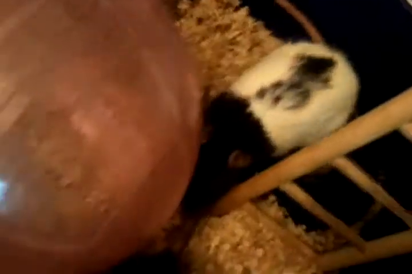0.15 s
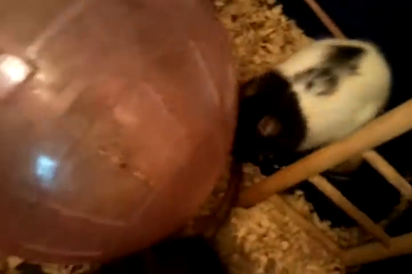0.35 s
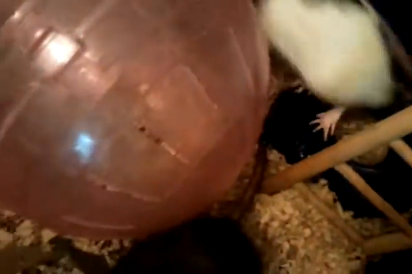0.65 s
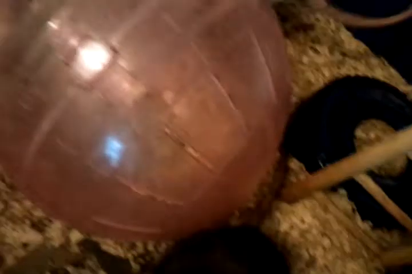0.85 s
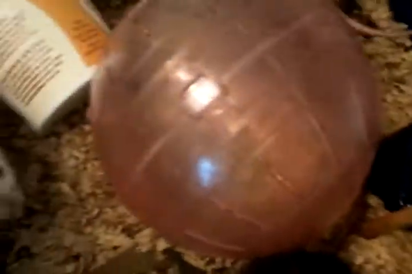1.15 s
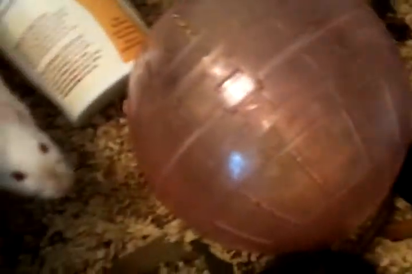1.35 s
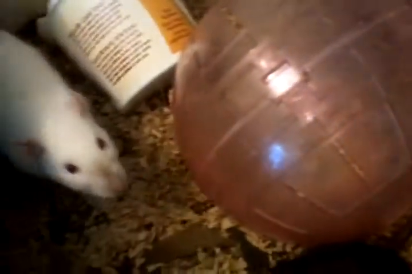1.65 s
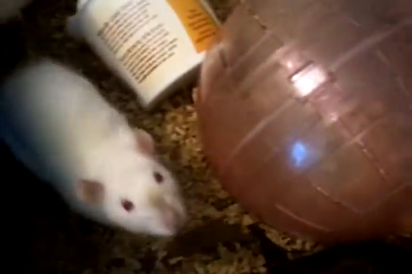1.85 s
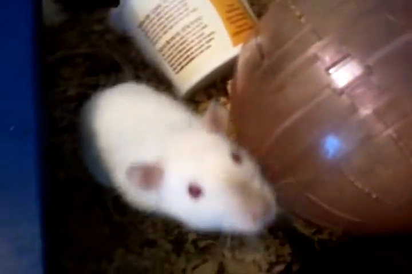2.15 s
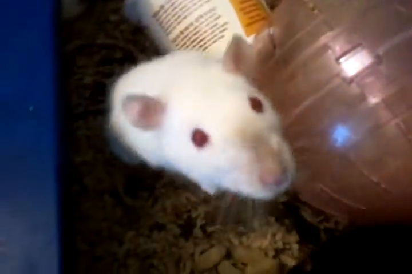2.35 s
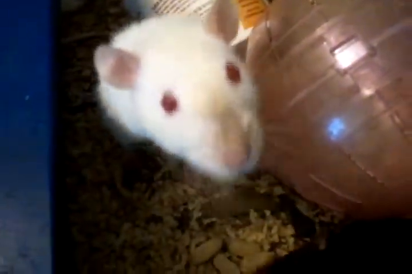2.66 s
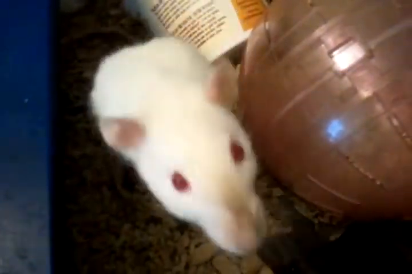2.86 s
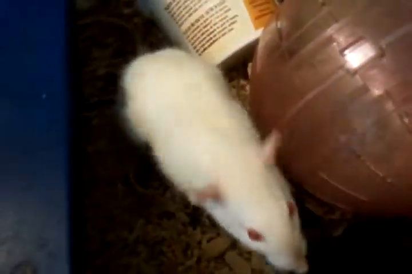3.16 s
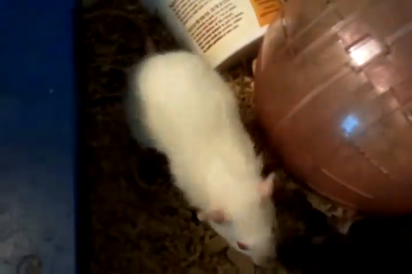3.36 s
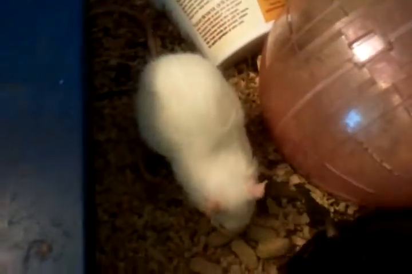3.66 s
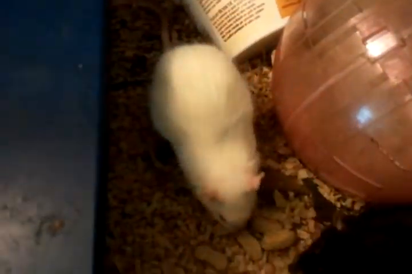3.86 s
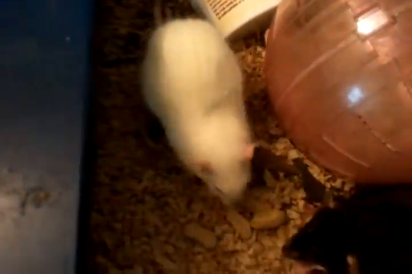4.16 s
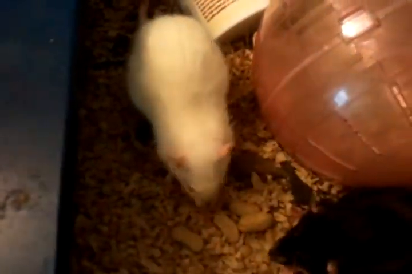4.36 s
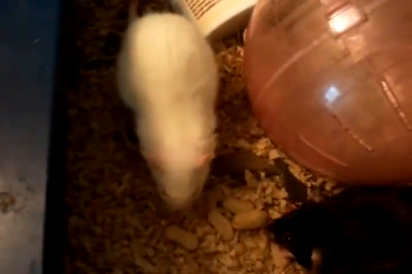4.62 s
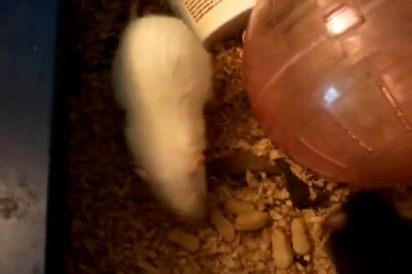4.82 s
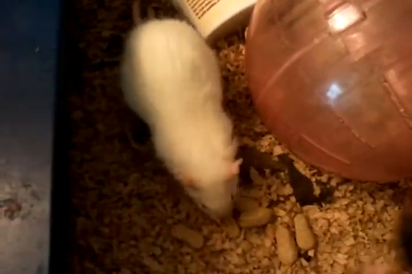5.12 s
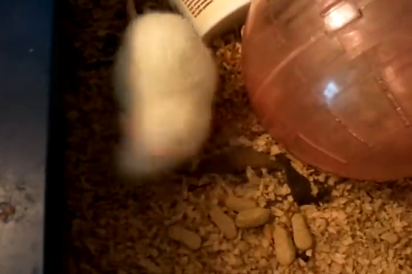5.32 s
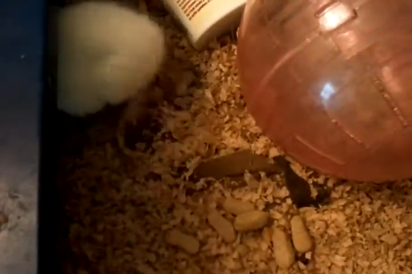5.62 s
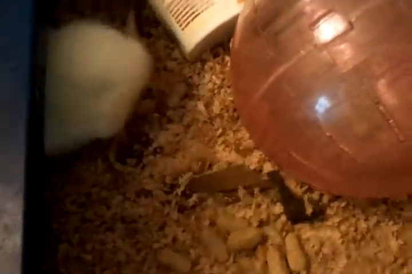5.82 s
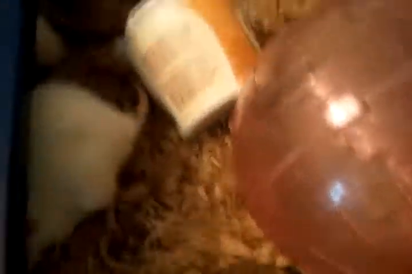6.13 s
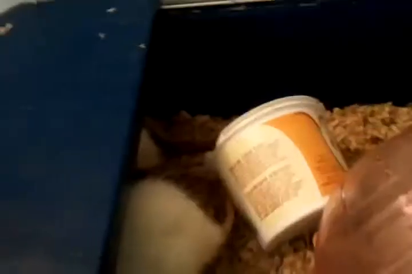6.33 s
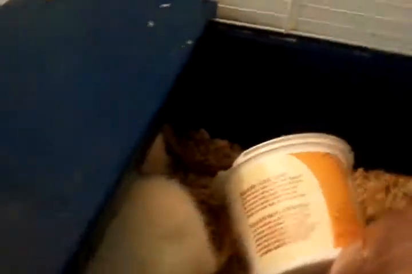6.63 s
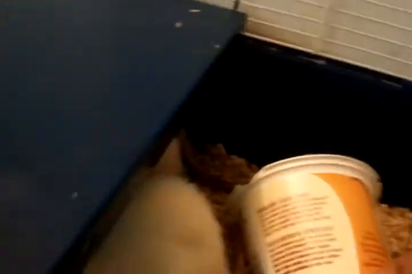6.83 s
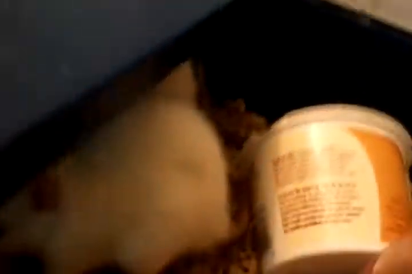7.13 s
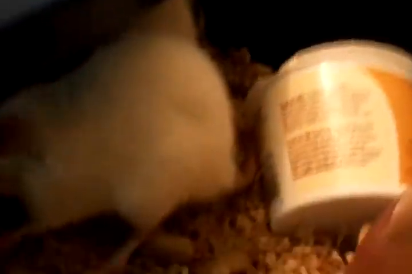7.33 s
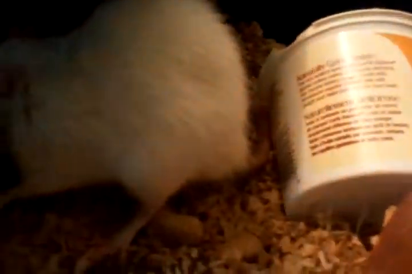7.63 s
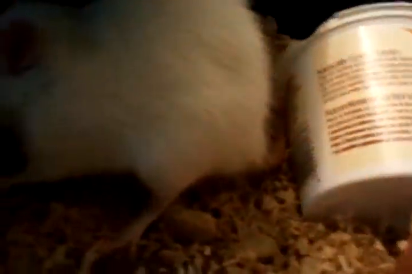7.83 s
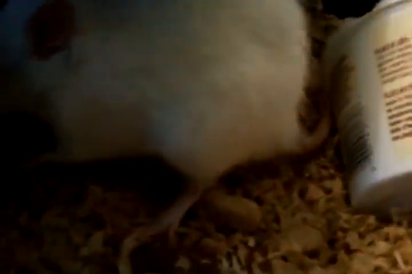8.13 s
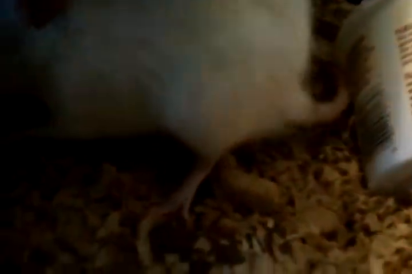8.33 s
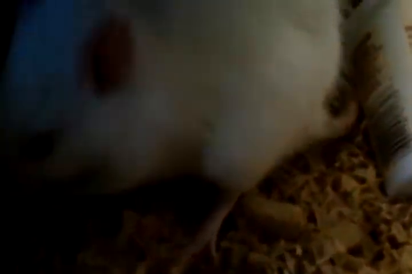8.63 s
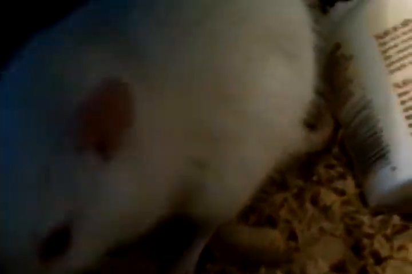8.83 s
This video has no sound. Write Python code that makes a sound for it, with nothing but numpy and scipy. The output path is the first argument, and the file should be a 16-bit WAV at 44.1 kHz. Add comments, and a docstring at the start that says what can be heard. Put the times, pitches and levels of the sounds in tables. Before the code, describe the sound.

Close in a cage, pet rats stir wood shavings: fine dry rustling, dense crisp snaps and small ticks over a faint low household hum. Bodies shift with soft hollow rumbles and occasional dull knocks on plastic. After about six seconds something soft bumps the small microphone, giving rough rubs, abrupt slaps and loud clipped pops. Rustling then fades, leaving sparse duller snaps, knocks and a few more touches. Treble is dulled.

```python
"""A fine rustle over a household hum comes first, soon with crisp snaps: pet rats dig and nibble in wood shavings.
Rustle and swishes are shaped noise, snaps are short noise bursts, and the hum, drone and tones are sine waves.
Bodies shifting are noise through the resonances of the cage; dull knocks are a tick and a fading ring.
Late on, something soft keeps touching the small microphone: a slap of abrupt swings, a rub of noise and
a pop as the pressure jumps. A narrow recorder dulls the treble and clips the loudest swings."""
import sys
import numpy as np
from scipy import signal
from scipy.fft import rfft, irfft
from scipy.io import wavfile
from scipy.ndimage import uniform_filter1d

SR = 44100
rng = np.random.default_rng(int(sys.argv[2]) if len(sys.argv) > 2 else 0)


def wav_out(sig):
    """Save sig, one row per channel (or a flat mono array), as 16-bit PCM at SR to the path in sys.argv[1]."""
    wavfile.write(sys.argv[1], SR, np.round(np.clip(np.atleast_2d(sig).T, -1, 1) * 32767).astype(np.int16))


N = 396018

# All levels are those going in, before any muffling by the microphone and the recorder.
# Hush of the room: (frequency [Hz], level per Hz [dB])
ROOM_COLOUR = [(30, -24), (70, -23), (120, -9), (200, -9), (520, -8), (1000, -13), (1700, -19.5),
               (5600, -18), (8000, -37)]
ROOM_DB = -58
HUM_HZ, HUM_DB = 121, -65.5
# Low drone that sags and holds: (time [s], pitch [Hz], level [dB])
DRONE_PATH = [(2.9, 94, -79), (3.0, 90, -58), (3.3, 90.5, -59.5), (3.4, 125, -88), (3.48, 113.4, -63),
              (3.65, 97, -64), (5.0, 96.4, -63.5), (6.1, 97.2, -65), (6.3, 96, -91)]

# Bedding settling all the time; the middle is near 4.5 kHz, the coarse grain below 3.5 kHz:
# (time [s], fine hiss level [dB], middle over fine [dB], coarse over fine [dB])
BEDDING_LEVELS = [(0, -58.5, -1, -9), (.6, -64.5, 1.5, -2), (.9, -55, 1.5, -10), (1.7, -59.5, -1.5, -6),
                  (2.3, -55.5, -0.5, -10), (2.8, -62.5, 1.5, -1), (3.25, -57.5, 1, -4.5),
                  (3.9, -63, -0.5, -1.5), (4.3, -59, 3, -1), (4.6, -62.5, 0.5, -3), (5.1, -52, -0.5, -11),
                  (5.6, -57.5, -1, -8.5), (6.2, -56, 3.5, -0.5), (7.1, -61.5, 2.5, 7.5), (7.6, -75, 6, 10),
                  (8.5, -78.5, 10, 12.5), (8.98, -74, 9, -2)]
# Paws stirring the bedding: (start [s], length [s], fine level [dB], coarse over fine [dB])
PAW_STIRS = [(0.098, 0.11, -53.5, -17), (0.672, 0.073, -55.5, -13), (0.744, 0.055, -38.5, -22),
             (.88, 0.16, -69, -23), (1.107, .12, -50.5, -11), (1.28, 0.17, -50.5, -6),
             (1.474, 0.11, -59, -20), (1.613, 0.082, -53, -20), (1.91, .05, -47, -1),
             (2.119, 0.057, -52, 0), (2.322, 0.057, -63, -16), (2.39, 0.085, -54, -8),
             (3.334, 0.063, -54, -22), (3.398, 0.045, -53, -23), (4.434, 0.078, -57.5, 2),
             (4.79, 0.36, -60, -9), (5.157, 0.052, -47, -9), (5.226, 0.18, -49, -9.5),
             (5.395, 0.11, -48, -13), (5.6, 0.086, -63, -3), (5.787, 0.1, -55.5, -22),
             (5.939, 0.083, -63, -5), (6.054, 0.01, -33, -21), (6.065, 0.051, -50, -20),
             (6.3, 0.13, -47, -21), (8.573, 0.014, -53, 5), (8.627, 0.028, -58, 2), (8.714, 0.09, -67, 3)]
STIR_RISE, STIR_FADE_DB = 0.12, -7.5  # share of the length spent rising; fall to the end
# Colours of the fine, middle and coarse rustle: (frequency [Hz], level per Hz [dB])
FINE_COLOUR = [(3500, -38), (5000, -8.5), (5900, 10.5), (6600, 9.5), (7300, -7.5), (8200, 8)]
MIDDLE_COLOUR = [(2600, -20), (3700, -8), (4500, -3.5), (5300, -1.5), (6500, -7.5)]
COARSE_COLOUR = [(500, -22), (1200, 0.5), (2400, 1.5), (3500, -3), (5000, -19.5)]

# Bodies shifting on the cage base: (start [s], length [s], low rumble level [dB], hollow middle level [dB])
BODY_SHIFTS = [(0.05, 0.056, -75, -63), (0.138, 0.11, -61, -84), (0.361, 0.019, -52, -56),
               (1.115, 0.37, -57, -64), (1.986, 0.042, -48.5, -67), (2.163, .2, -62, -45.5),
               (2.48, 0.35, -64, -53), (2.977, 0.55, -63.5, -57), (3.923, 0.092, -59, -60),
               (4.075, 0.03, -68, -52), (4.107, .65, -44, -57.5), (4.868, 0.092, -56, -60),
               (5.225, 0.17, -58, -55.5), (5.448, 0.043, -54, -56), (5.579, 0.25, -63, -64),
               (5.77, 0.13, -69, -59), (5.997, 0.5, -58, -57), (6.187, 2.9, -51, -51),
               (7.27, 0.071, -53, -42.5), (7.499, 0.045, -41, -52), (7.57, 0.13, -75, -74),
               (7.956, 0.18, -59, -67), (8.116, 0.18, -44.5, -57), (8.268, 0.76, -61.5, -61)]
SHIFT_RISE, SHIFT_FADE_DB = .15, -11.5  # share of the length spent rising; fall to the end
REST_LOW_DB, REST_HOLLOW_DB = -65.5, -78.5  # what stays between the shifts
# Resonances of the cage base, then of the hollow tub: (frequency [Hz], width [Hz], relative level [dB])
BASE_MODES = [(74, 19, -3), (146.6, 13, -2), (171, 33, -3.5), (237, 25, -1.5), (347, 69, -3.5),
              (470, 110, -3), (737, 100, -24)]
TUB_MODES = [(547, 45, 0), (713, 130, 2), (828, 32, 1), (1092, 99, -1), (1440, 220, -6.5)]

# Shavings and food snapping; the body is below 2 kHz:
# (time [s], peak of the bright part [dB], ring [Hz], body over bright [dB], splinter tail [dB])
SNAP_EVENTS = [(0.0872, -30.5, 5930, -15, -21), (0.111, -30, 5450, -22, -21), (0.2463, -32, 3450, -16, -21),
               (0.3674, -59, 4390, -2, -21), (0.41, -32, 6700, -25, -19), (0.5477, -33.5, 5830, -18, -21),
               (0.5623, -30.5, 5670, -22, -18), (0.614, -34.5, 5830, -23, -17),
               (0.7484, -32, 4520, -24, -21), (0.755, -22, 5920, -20, -22), (0.7604, -23, 6200, -25, -21),
               (0.8058, -10, 5940, -47, -15), (0.83, -19, 5800, -27, -17), (0.876, -15.5, 5860, -39, -13),
               (0.9017, -31, 5210, -28, -23), (0.906, -26, 6010, -28, -21), (0.9767, -13, 5900, -19.5, -20),
               (1.0843, -33, 6260, -19, -21), (1.0955, -21, 6220, -16, -21), (1.1234, -24, 6290, -21, -23),
               (1.1327, -11, 5800, -18.5, -19), (1.1408, -19, 5970, -19, -21),
               (1.1484, -20, 6370, -18, -24), (1.1754, -13.5, 5940, -20, -19),
               (1.295, -27.5, 6300, -22, -17), (1.429, -34, 3950, -15, -21), (1.5035, -27, 5700, -27, -21),
               (1.5554, -30, 4510, -29, -19), (1.5617, -31, 3620, -25, -19),
               (1.6177, -22.5, 6230, -33, -19), (1.6427, -24, 5550, -24, -23),
               (1.6761, -34, 5190, -17, -21), (1.701, -13.5, 6100, -36, -28), (1.7489, -20, 5370, -26, -21),
               (1.8018, -28.5, 4220, -24, -20), (1.858, -29, 6230, -3, -15), (1.8637, -34, 4410, 0, -24),
               (1.91, -22.5, 5440, 1, -24), (1.917, -30, 4030, -19, -24), (1.9224, -25, 4570, -15, -21),
               (1.9268, -25, 4600, -16, -21), (1.9378, -29, 3800, -11, -21), (1.952, -23, 6090, -6, -17),
               (1.9664, -31, 5490, -11, -21), (1.9894, -16.5, 5600, -14, -15),
               (2.0607, -32, 4370, -18, -19), (2.1231, -24, 5300, -14, -26),
               (2.1284, -23.5, 5630, -13, -25), (2.1316, -21, 5470, -26, -21),
               (2.1402, -24, 4580, -25, -21), (2.1454, -20.5, 5460, -15, -21),
               (2.16, -21.5, 3900, -23, -21), (2.1734, -31, 3720, -4, -23), (2.208, -28, 5200, -17, -21),
               (2.2577, -30, 4770, -22, -23), (2.2804, -36, 5620, -18, -21),
               (2.2874, -29.5, 5800, -29, -21), (2.3067, -38, 5960, -18, -21), (2.347, -28, 5560, -23, -23),
               (2.3667, -19, 5530, -16, -16), (2.4007, -12, 6000, -10, -16), (2.4463, -35, 3540, -17, -21),
               (2.4784, -37, 5920, -12, -21), (2.5047, -22.5, 4000, -33, -21), (2.512, -28, 5660, -24, -15),
               (2.5431, -25, 6150, -20, -21), (2.577, -28.5, 5710, -23, -19), (2.603, -41, 5240, -10, -21),
               (2.6319, -39, 3360, -4, -21), (2.7016, -33, 5800, -25, -21), (2.7214, -23.5, 5670, -22, -19),
               (2.7296, -22.5, 4200, -30, -15), (2.7487, -25, 4200, -26, -17),
               (2.7795, -26.5, 5800, -22, -18), (2.8008, -29, 4120, -25, -21),
               (2.826, -18.5, 4930, -36, -26), (2.9265, -31.5, 5800, -20, -21),
               (2.946, -30, 6320, -20, -21), (2.9948, -29, 4950, -10, -15), (3.043, -32, 5400, -22, -21),
               (3.1375, -35.5, 5250, -1, -15), (3.212, -30.5, 3560, -3, -24), (3.2412, -22, 5600, -10, -13),
               (3.263, -26, 5780, -21, -21), (3.2836, -27, 4350, -25, -21), (3.3074, -25, 6170, -20, -19),
               (3.3149, -21, 6190, -12.5, -18), (3.3358, -30, 6070, -29, -21),
               (3.3444, -27, 4730, -22, -20), (3.3527, -6.5, 5970, -41, -18), (3.357, -30, 5550, -24, -21),
               (3.4052, -14, 6200, -30, -18), (3.4979, -36, 5200, -11, -21), (3.5394, -26.5, 5290, -4, -21),
               (3.5558, -29, 5260, -19, -21), (3.6105, -31, 4140, -23, -21), (3.684, -36, 5950, -18, -21),
               (3.714, -27.5, 5930, -20, -18), (3.8544, -36, 4370, -12, -16), (3.931, -56, 5950, 4, -21),
               (3.9512, -36, 6300, 0.5, -19), (3.9905, -30.5, 4660, -15, -21),
               (4.0345, -36, 4330, -20, -21), (4.119, -39, 4000, 1, -21), (4.1347, -27.5, 4150, 4.5, -24),
               (4.1599, -27.5, 3700, -4.5, -19), (4.1806, -30.5, 5440, -5, -21),
               (4.2764, -37, 4460, -19, -21), (4.3316, -31, 4730, -9, -21), (4.3667, -27, 4750, -4, -26),
               (4.442, -25.5, 3150, -6, -21), (4.451, -28.5, 4730, -19, -21), (4.4674, -28, 4310, -12, -21),
               (4.5067, -28.5, 4300, -20, -17), (4.5263, -33, 3690, -16, -21),
               (4.551, -29.5, 3650, -19, -18), (4.591, -33, 5200, -26, -21), (4.6402, -27, 4340, -13, -13),
               (4.6723, -25.5, 4260, -16, -14), (4.7381, -33, 3360, -21, -21),
               (4.7696, -33, 3730, -11, -15), (4.805, -33, 5240, -23, -17), (4.8898, -19.5, 4260, -14, -21),
               (4.9294, -24.5, 5250, -15, -14), (4.9347, -20.5, 3760, -19, -19),
               (4.9965, -32, 3970, -15, -19), (5.0874, -40, 3870, -16, -16), (5.1508, -11, 5650, -27, -21),
               (5.1607, -15, 5060, -14.5, -15), (5.2177, -31, 6220, -18, -18),
               (5.2485, -22.5, 4410, -24, -21), (5.28, -27, 5960, -21, -25), (5.304, -22.5, 4020, -30, -21),
               (5.3352, -21.5, 4470, -10.5, -11), (5.4922, -36, 5320, -30, -21),
               (5.63, -31, 4340, -17, -19), (5.82, -36, 5350, -18, -21), (5.9744, -35, 5460, -16, -21),
               (6.0525, -15.5, 3950, -32, -8), (6.0971, -15, 5100, -10, -23),
               (6.2526, -12, 4900, -7.5, -23), (6.3473, -18, 4570, -17, -27), (6.357, -9, 5740, -20, -18),
               (6.3634, -24, 4550, -19, -20), (6.764, -8.5, 4010, -17, -21), (7.0807, -25, 3380, -9, -25),
               (7.1207, -31, 3420, -5, -19), (7.1416, -20, 4330, -13, -9), (7.9, -35, 4140, -19, -21),
               (8.1915, -24.5, 4270, -13, -14), (8.2079, -27.5, 3300, 5, -20),
               (8.3073, -28.5, 4270, -16, -15), (8.326, -23.5, 4450, -20, -12), (8.349, -37, 3820, -9, -21),
               (8.3664, -36, 4150, -10, -21), (8.3913, -24, 3940, -16, -21),
               (8.4257, -32, 3810, -16.5, -19), (8.5732, -28, 3780, -14, -21),
               (8.5804, -27, 4290, -14, -21), (8.6343, -29, 3890, -16, -19), (8.6797, -30, 3280, -9, -13),
               (8.7458, -17, 4050, -25, -23), (8.7595, -22.5, 3800, -16, -18), (8.922, -33, 4070, -2, -19),
               (8.9264, -33, 4130, -17, -21)]
# The many faint snaps: least level over the bedding, random extra level, middle and reach of the ring, body
FAINT_OVER_DB, FAINT_SPREAD_DB = 20.5, 2.5
FAINT_HZ, FAINT_REACH_HZ, FAINT_BODY_DB = 4800, 1540, -12.5
# From this time on the microphone is half covered and snaps are duller
SHADED_S, SHADED_HZ, OPEN_HZ = 6.2, 4800, 7730

# Dull knocks on the tub, the ball and the phone: (time [s], ring level [dB], ring [Hz], time to fall 60 dB [s])
KNOCK_EVENTS = [(0.368, -41, 111, 0.034), (0.3683, -35, 600, 0.01), (1.043, -34, 850, 0.008),
                (1.165, -32.5, 102, 0.046), (1.993, -36, 336, 0.032), (2.399, -38, 540, 0.026),
                (3.132, -44.5, 435, 0.065), (3.356, -47, 1110, 0.027), (3.932, -31, 885, 0.0094),
                (4.087, -39, 83.2, 0.03), (4.882, -46, 262, 0.042), (8.09, -39, 213, 0.059),
                (8.126, -42, 308, 0.036), (8.354, -50, 206, 0.038), (8.396, -32, 480, 0.037),
                (8.429, -36, 480, 0.029), (8.478, -45, 151, 0.038), (8.523, -37, 454, 0.017),
                (8.924, -38.5, 435, 0.04)]
# Faint low tones that come and go: (start [s], end [s], pitch [Hz], level before wavering [dB])
LOW_TONES = [(1.12, 1.5, 88, -72), (2.48, 2.68, 170, -64), (4.2, 4.6, 141, -53), (4.85, 5.36, 236, -65.5),
             (3.3, 4.85, 180, -73)]
# Fur on shavings and, faintly pitched, on hollow plastic:
# (start [s], end [s], centre [Hz], filter width [Hz], level [dB])
FUR_SWISHES = [(1.288, 1.41, 3700, 3100, -54), (2.17, 2.27, 1400, 83, -62), (2.186, 2.252, 1550, 880, -57),
               (2.21, 2.327, 800, 100, -58), (2.5, 2.66, 790, 118.8, -58.5), (3.026, 3.16, 1080, 64.8, -62),
               (4.16, 4.49, 4900, 920, -57), (5.234, 5.298, 3400, 3100, -48), (8.005, 8.122, 838, 130, -53)]

# Touches on the microphone: (start [s], end [s], slap length [s], slap level [dB], average swing rate [Hz],
# rub at start [dB], rub in the middle [dB], rub at end [dB], rub treble over low part [dB], lift-off level [dB])
MIC_TOUCHES = [(6.182, 6.199, .006, -46, 1200, -39, -40, -40.5, -10, -31),
               (6.2378, 6.3383, .006, -39, 1730, -36, -17, -39.5, -0.5, -32),
               (6.385, 6.3978, 0.0049, -38.5, 3230, -46, -49, -47, -9, -39),
               (6.4444, 6.526, 0.005, -47, 1420, -38, -35.5, -40.5, 0.3, -41),
               (6.542, 6.613, 0.0019, -21.5, 432, -41.5, -35.5, -40.5, 2.5, -51),
               (6.613, 6.693, 0.0051, -48, 2080, -43.5, -45, -48, -2, -50),
               (6.689, 6.8264, .006, -47, 1220, -35, -27.5, -31, -4.5, -33),
               (6.841, 6.845, 0.0044, -18, 837, -13, -32, -23, -26, -19),
               (6.85, 6.913, 0.0028, -18, 488, -31.5, -25, -27, -12, -16),
               (6.923, 6.931, 0.0035, -14, 692, -22, -17, -32, -20, -16),
               (6.9456, 6.9993, .004, -11.5, 623, -22, -23, -29, -14, -18.5),
               (7.014, 7.0303, .0033, -7.5, 1470, -13, -28.5, -30, -14, -18),
               (7.0495, 7.0638, 0.0026, -7.5, 1853, -14, -24.5, -30, -7, -21),
               (7.1038, 7.1104, 0.0039, -20, 833, -16, -16, -19.5, -31, -20.5),
               (7.1907, 7.2017, 0.0015, -26, 523, -23, -13.5, -27, -16, -24),
               (7.2104, 7.238, 0.0028, -8.5, 515, -20, -28.5, -33, -16, -21),
               (7.2574, 7.273, .0031, -11.5, 485, -12.5, -32, -28.5, -21, -23),
               (7.2945, 7.296, .004, -31, 613, -36, -22, -30, -17, -13.5),
               (7.3196, 7.3254, 0.0068, -22, 894, -16.5, -3.5, -23, -23, -11.5),
               (7.361, 7.3834, .0032, -7.5, 510, -18, -36, -30, -12, -23),
               (7.4084, 7.509, 0.0043, -8.5, 455, -31, -29, -25, -13, -13.5),
               (7.602, 7.6176, 0.0033, -5.5, 626.5, -16.5, -28.5, -34.5, -26, -9.5),
               (7.8688, 7.8833, 0.0065, -8, 644.5, -11, -24, -30, -20, -8),
               (8.213, 8.223, 0.0035, -36, 910, -33, -21.5, -31, -21, -19),
               (8.2255, 8.246, 0.0022, -28, 730, -19.5, -25, -31.5, -20.5, -14),
               (8.5538, 8.558, 0.0065, -34, 967, -29.5, -28, -49, -15.5, -44),
               (8.6245, 8.6317, 0.0047, -32, 680, -51, -45, -48, -11, -15.5),
               (8.694, 8.7004, 0.0031, -22.5, 424, -24, -31, -30, -14, -16),
               (8.6993, 8.7284, 0.0025, -17, 445, -25, -20, -32, -12.5, -16)]
# The port seals or clears all at once: (time [s], level [dB], strength, plus for a push, minus for a pull)
PORT_POPS = [(6.8205, -15, 1), (6.8432, -8, 1), (6.9258, -2, -0.95), (6.9476, -1.5, -1.04),
             (7.0505, -6.5, -1.06), (7.1065, -5.5, -1.1), (7.1949, -5, 0.95), (7.2117, -1.5, -0.7),
             (7.2593, -5, -0.91), (7.4105, 0, -1.06), (7.4389, -8.5, 1), (8.219, -3.5, 1),
             (8.5599, -14.5, 1), (8.6323, -20.5, 0.94), (8.6973, -4, 1), (8.7061, -2.5, 1)]
# Colours of the low and high part of a rub: (frequency [Hz], level per Hz [dB])
RUB_LOW_COLOUR = [(60, -2.5), (190, 0), (1100, -1.5), (2200, -6), (4000, -10.5), (8000, -31.5)]
RUB_HIGH_COLOUR = [(1200, -37), (2500, -5), (4000, 1), (6200, 1.5), (8000, -10.5)]
COVERED_HZ = 4500  # the touch itself muffles the port
CASE_HZ, CASE_WIDTH_HZ, CASE_DB = 230, 200, -10  # the phone's case booms when touched

MIC_LOW_HZ = 86  # slow pressure below this leaks away
MIC_DULL_HZ, MIC_TOP_HZ, TOP_HZ = 7050, 7480, 16400
CLIP = .7  # largest swing that is not flattened, full scale being 1


def undb(db):
    """Turn decibels into a gain."""
    return 10 ** (np.asarray(db) / 20)


def unit(x):
    """Scale to an average (rms) strength of 1."""
    return x / np.sqrt(np.mean(x ** 2))


def curve(s, values):
    """Draw straight lines through the points, one value a sample."""
    return np.interp(np.arange(N) / SR, s, values)


def colour(x, points):
    """Shape the spectrum by (Hz, dB) points, then scale to rms 1."""
    hz, db = np.transpose(points)
    grid = np.log(np.maximum(np.fft.rfftfreq(N, 1 / SR), 1))
    gain = undb(np.interp(grid, np.log(hz), db))
    return unit(irfft(rfft(x) * gain, N))


def band(x, hz, width):
    """Ring like a resonance, with gain 1 at its centre."""
    sharpness = max(hz / width, .3)
    return signal.lfilter(*signal.iirpeak(min(hz, SR / 3), sharpness, fs=SR), x)


def lowpass(x, hz):
    """Muffle gently above hz."""
    return signal.sosfilt(signal.butter(2, hz, fs=SR, output="sos"), x)


def walk(rate):
    """Glide between random levels, a new one each 1 / rate seconds; spread near 1."""
    k = int(SR / rate)
    steps = np.repeat(rng.standard_normal(N // k + 1), k)
    return 1.38 * uniform_filter1d(steps, k)[:N]


def add(out, s, x):
    """Mix x in at time s."""
    i = int(s * SR)
    out[i:i + len(x)] += x[:N - i]


def bouts(s, length, db, rise, fade_db):
    """Gain of a row of bouts: each rises, then fades to its end."""
    out = np.zeros(N)
    for start, span, top_db in zip(s, length, db):
        u = np.linspace(0, 1, int(span * SR))
        fade = undb(top_db + fade_db * np.clip((u - rise) / (1 - rise), 0, 1))
        ends = np.minimum(u / rise, 1) * np.minimum(10 * (1 - u), 1)
        add(out, start, fade * ends)
    return out


def household():
    """A steady hum and a low drone are sine waves; the hush of the room is noise."""
    s, hz, db = np.transpose(DRONE_PATH)
    drone = undb(curve(s, db)) * np.sin(2 * np.pi * np.cumsum(curve(s, hz)) / SR)
    hum = undb(HUM_DB + 1.5 * walk(1.8)) * np.sin(2 * np.pi * HUM_HZ * np.arange(N) / SR)
    hush = undb(ROOM_DB + 1.3 * walk(4.2)) * colour(rng.standard_normal(N), ROOM_COLOUR)
    return np.sqrt(2) * (drone + hum) + hush  # the root makes the sine levels rms


def rustle(grains_hz=900, spread_db=4.0, smooth=0.87):
    """Dense tiny crackles of uneven size over the smooth hiss of many more."""
    s, db, middle_db, coarse_db = np.transpose(BEDDING_LEVELS)
    start, length, stir_db, stir_coarse_db = np.transpose(PAW_STIRS)
    sizes = undb(spread_db * np.minimum(rng.exponential(size=N), 4))
    hits = (rng.random(N) < grains_hz / SR) * sizes
    grains = signal.lfilter([1], [1, -.95], hits) * rng.standard_normal(N)  # each lasts about half a millisecond
    mix = unit(grains) + smooth * undb(2 * walk(40)) * rng.standard_normal(N)
    fine_gain = undb(curve(s, db)) + bouts(start, length, stir_db, STIR_RISE, STIR_FADE_DB)
    coarse_stirs = bouts(start, length, stir_db + stir_coarse_db, STIR_RISE, STIR_FADE_DB)
    coarse_gain = undb(curve(s, db + coarse_db)) + coarse_stirs
    fine = colour(mix, FINE_COLOUR) + undb(curve(s, middle_db)) * colour(mix, MIDDLE_COLOUR)
    flicker = undb(1.04 * walk(12))
    return flicker * (fine_gain * fine + coarse_gain * colour(mix, COARSE_COLOUR))


def shifting():
    """Uneven pushes shake the cage base and the plastic tub, which ring at their own pitches."""
    s, length, low_db, hollow_db = np.transpose(BODY_SHIFTS)
    out = np.zeros(N)
    for modes, db, rest_db in ((BASE_MODES, low_db, REST_LOW_DB), (TUB_MODES, hollow_db, REST_HOLLOW_DB)):
        ring = np.zeros(N)
        for hz, width, mode_db in modes:
            ring += undb(mode_db + 2 * walk(20)) * unit(band(rng.standard_normal(N), hz, width))
        out += unit(ring) * (undb(rest_db) + bouts(s, length, db, SHIFT_RISE, SHIFT_FADE_DB))
    return out


def faint_snaps(count=60):
    """Rows of small snaps at random moments, following the level of the bedding."""
    u = rng.random((count, 4)).T
    s, db = np.transpose(BEDDING_LEVELS)[:2]
    at = u[0] * (N / SR - .1)
    extra_db = -FAINT_SPREAD_DB * np.log(np.maximum(u[1], .1))
    peak_db = np.interp(at, s, db) + FAINT_OVER_DB + extra_db
    ring_hz = FAINT_HZ + FAINT_REACH_HZ * (2 * u[2] - 1)
    body_db = FAINT_BODY_DB + 12 * (u[3] - .5)
    tail_db = np.full(count, -20.)
    return list(zip(at, peak_db, ring_hz, body_db, tail_db))


def snaps(crack_s=0.00075, splinter_s=0.011, echo_s=0.0029, echo_db=-14, dry_db=-9):
    """Each snap is a crack, a short fading tail of splinters and a bounce off the cage wall."""
    out, t = np.zeros(N), np.arange(2048) / SR
    rows = SNAP_EVENTS + faint_snaps()
    noise = rng.standard_normal((len(rows), 2, 2048))
    crack = t / crack_s * np.exp(1 - t / crack_s) ** 2
    for (s, db, hz, body_db, tail_db), (bright_noise, body_noise) in zip(rows, noise):
        shape = crack + undb(tail_db) * np.exp(-t / splinter_s)
        burst = bright_noise * shape
        # a clear ring plus a broad, dry crackle
        bright = band(burst, hz, 0.14 * hz) + undb(dry_db) * band(burst, 5230, 3000)
        body = band(band(body_noise * shape, 1700, 2400), 1700, 2400)
        x = undb(db) * (bright / np.abs(bright).max() + undb(body_db) * body / np.abs(body).max())
        add(out, s, x)
        add(out, s + echo_s, undb(echo_db) * x)
    return np.where(np.arange(N) > SHADED_S * SR, lowpass(out, SHADED_HZ), lowpass(out, OPEN_HZ))


def knocks(tick_db=-3, tick_s=0.0011):
    """A knock is a dry tick and one ring that dies away."""
    out, t = np.zeros(N), np.arange(8192) / SR
    noise = rng.standard_normal((len(KNOCK_EVENTS), 8192))
    ticks = signal.lfilter([.25], [1, -.75], noise) * np.exp(-t / tick_s)
    for (s, db, hz, t60), tick in zip(KNOCK_EVENTS, ticks):
        ring = undb(-60 * t / t60) * np.sin(2 * np.pi * hz * t)
        add(out, s, undb(db) * (ring + undb(tick_db) * tick / np.abs(tick).max()))
    return out


def tones(wobble_db=-4.5):
    """Each low sine tone swells, wavers and fades."""
    out, waver = np.zeros(N), undb(wobble_db * walk(12))
    for s, end, hz, db in LOW_TONES:
        t = np.arange(int((end - s) * SR)) / SR
        add(out, s, undb(db) * signal.windows.tukey(len(t), .4) * np.sin(2 * np.pi * hz * t))
    return np.sqrt(2) * out * waver


def swishes():
    """Rubbing fur gives a soft hiss in one band, swelling and fading."""
    out, air = np.zeros(N), rng.standard_normal((len(FUR_SWISHES), SR))
    for (s, end, hz, width, db), noise in zip(FUR_SWISHES, air):
        piece = noise[:int((end - s) * SR)]
        hiss = unit(band(band(piece, hz, width), hz, width))
        add(out, s, undb(db) * signal.windows.tukey(len(hiss), .3) * hiss)
    return out


def touches(lift_s=0.0025, grit_db=-9, pop_s=0.00076, rise_s=0.00014):
    """A touch squeezes the air at the port in a few abrupt swings, scrapes while it lasts and sucks on leaving."""
    slaps, rubs, t = np.zeros(N), np.zeros(N), np.arange(512) / SR
    low = colour(rng.standard_normal(N), RUB_LOW_COLOUR) * undb(1.64 * walk(200))
    high = colour(rng.standard_normal(N), RUB_HIGH_COLOUR) * undb(2.0 * walk(270))
    chance = rng.standard_normal((len(MIC_TOUCHES), 2, 512))
    lift = np.hanning(int(lift_s * SR))
    for row, (sway, grit) in zip(MIC_TOUCHES, chance):
        s, end, slap_s, slap_db, hz, *rub_db, treble_db, lift_db = row
        # the swing rate wavers, so no two slaps are alike
        phase = 2 * np.pi * np.cumsum(hz * (1 + uniform_filter1d(sway, size=24))) / SR
        swing = np.tanh(5.0 * np.sin(phase)) + undb(grit_db) * grit
        arch = np.sqrt(np.clip(np.sin(np.pi * np.minimum(t / slap_s, 1)), 0, 1))
        add(slaps, s, undb(slap_db) * swing * arch)
        i, j = int(s * SR), int(end * SR)
        along = np.linspace(0, 1, j - i)
        press = undb(np.interp(along, np.linspace(.1, .9, len(rub_db)), rub_db))
        scrape = low[i:j] + undb(treble_db) * high[i:j]
        add(rubs, s, press * signal.windows.tukey(j - i, .12) * scrape)
        add(slaps, end - lift_s / 2, -undb(lift_db) * lift)
    pop = np.minimum(t / rise_s, 1) * np.exp(-(t / pop_s) ** 2)
    for s, db, sense in PORT_POPS:
        add(slaps, s, sense * undb(db) * pop)
    return lowpass(slaps, COVERED_HZ) + rubs


def scene():
    """Everything at the one microphone, whose port leaks slow pressure away."""
    leak = signal.butter(1, MIC_LOW_HZ, "high", fs=SR)
    contact = signal.lfilter(*leak, signal.lfilter(*leak, touches() + knocks()))
    contact = contact + undb(CASE_DB) * band(contact, CASE_HZ, CASE_WIDTH_HZ)
    cage = snaps() + rustle() + swishes() + signal.lfilter(*leak, shifting())
    return (cage + tones() + household() + contact)[None]


def record(dry):
    """A narrow recorder: the treble fades and ends early, the loudest swings clip, the top is cut."""
    dull = signal.sosfilt(signal.butter(N=5, Wn=MIC_DULL_HZ, fs=SR, output="sos"), dry)
    narrow = signal.sosfilt(signal.ellip(5, .5, 15, MIC_TOP_HZ, fs=SR, output="sos"), dull)
    narrow = signal.sosfilt(signal.ellip(6, .5, 60, 9050, fs=SR, output="sos"), narrow)
    clipped = np.clip(narrow, -CLIP, CLIP)
    return signal.sosfilt(signal.ellip(8, .2, 70, TOP_HZ, fs=SR, output="sos"), clipped)


dry = scene()
out = record(dry)
wav_out(out)
```